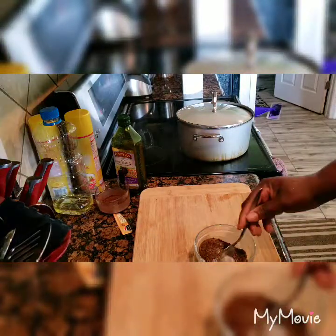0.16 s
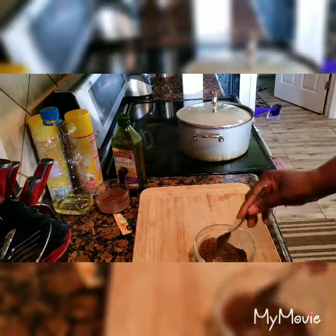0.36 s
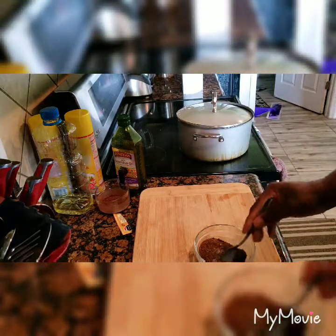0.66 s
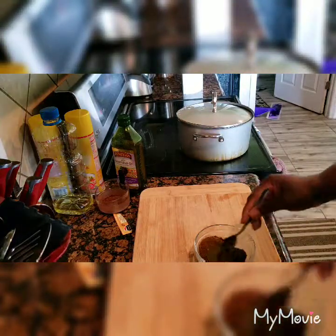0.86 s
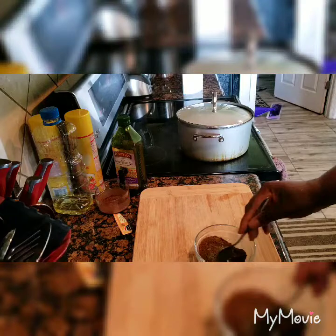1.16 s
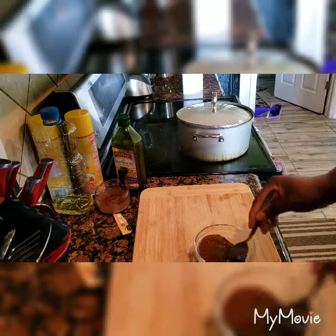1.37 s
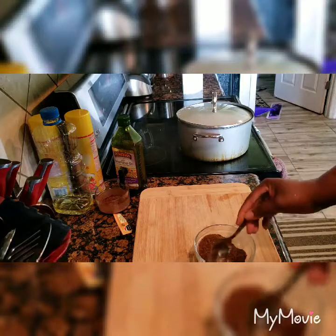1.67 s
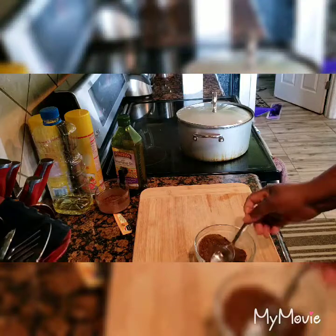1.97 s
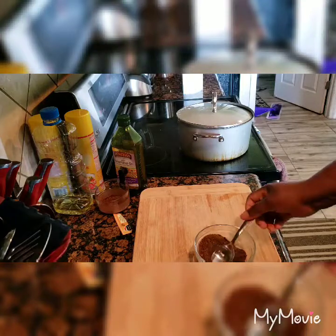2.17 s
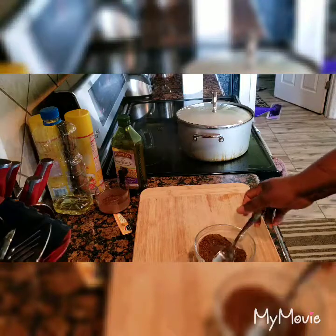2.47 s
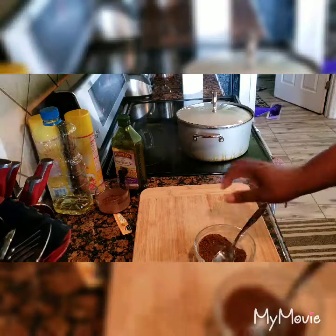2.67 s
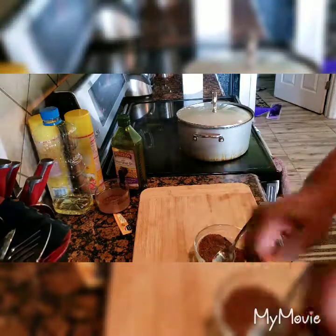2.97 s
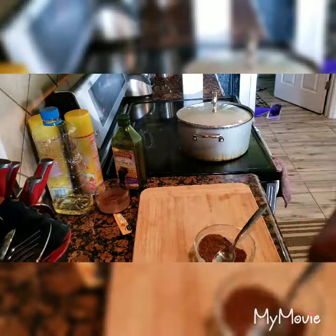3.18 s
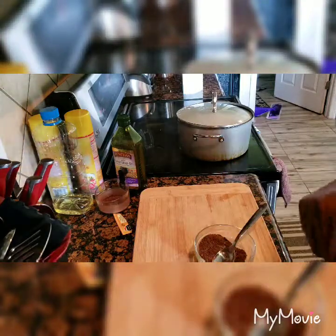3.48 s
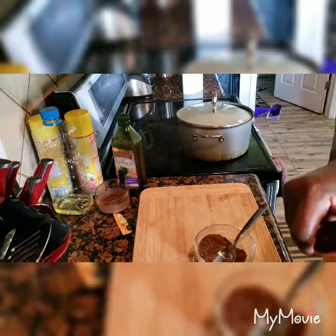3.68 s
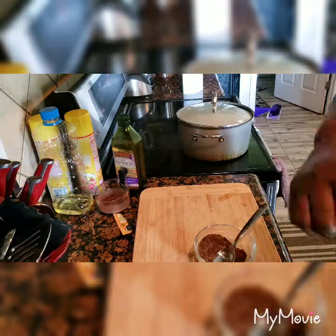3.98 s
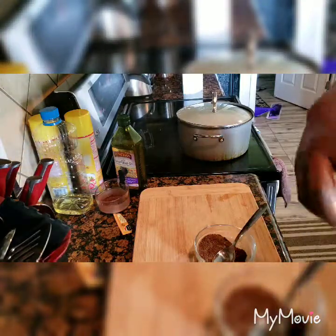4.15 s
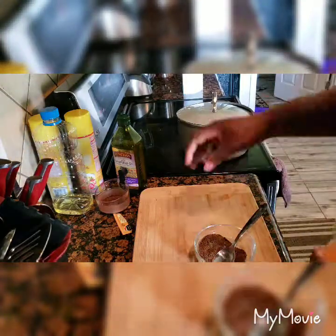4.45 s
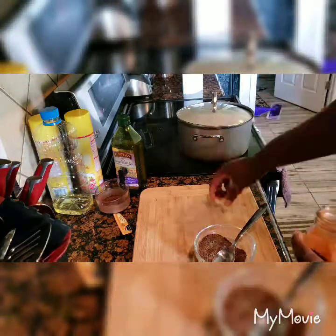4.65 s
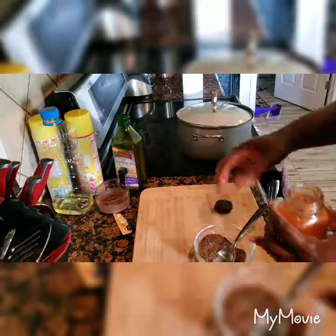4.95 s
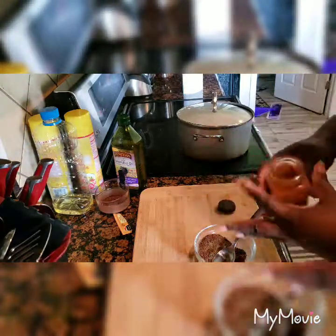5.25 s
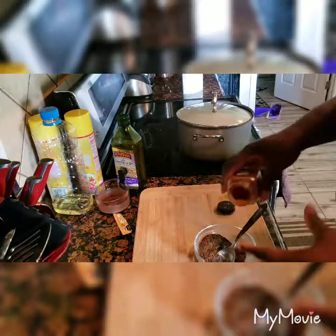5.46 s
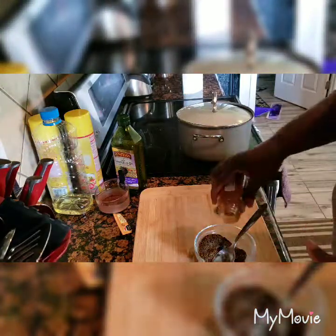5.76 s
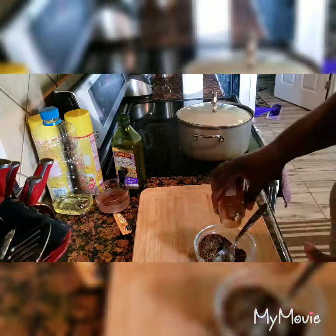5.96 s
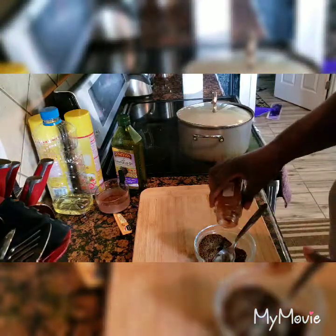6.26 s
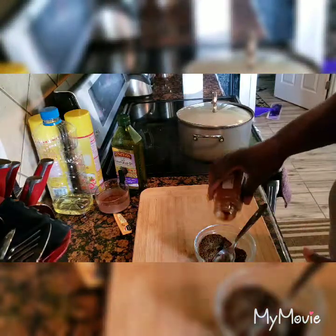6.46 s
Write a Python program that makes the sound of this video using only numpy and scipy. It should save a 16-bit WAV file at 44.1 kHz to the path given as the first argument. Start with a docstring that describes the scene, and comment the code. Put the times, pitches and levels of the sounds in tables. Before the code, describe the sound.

Close up in a lightly echoing kitchen, an appliance hums steadily while a spoon crunches softly through dry spices, tapping a glass bowl that bumps on a wooden board. The stirring ends with a bright chatter of the spoon on the rim. Then the cap of a spice jar rasps along its thread, clicks free, lands sharply on the board and rocks faintly like a coin until it lies flat.

```python
"""Over an appliance's steady hum, a metal spoon stirs gritty dry spices and taps a small glass bowl,
which knocks and scuffs on a wooden kitchen board. The spoon is let go and rings against the rim.
Then the cap of a spice jar is twisted off and dropped on the board, where it bounces and wobbles to rest.
Each hit is a set of fading tones plus a burst of noise; each rub is a stream of tiny random slips."""
import sys
import numpy as np
from scipy import signal
from scipy.fft import rfft, irfft, next_fast_len
from scipy.io import wavfile

SR = 44100
rng = np.random.default_rng(int(sys.argv[2]) if len(sys.argv) > 2 else 0)


def wav_out(sig):
    """Save sig, one row per channel (or a flat mono array), as 16-bit PCM at SR to the path in sys.argv[1]."""
    wavfile.write(sys.argv[1], SR, np.round(np.clip(np.atleast_2d(sig).T, -1, 1) * 32767).astype(np.int16))


N = 292118
TIME = np.arange(N) / SR

# Levels are relative, as the mix changes them later. A fade time (t60) is the time to fall by 60 dB.
# The appliance's hum. Each row: pitch in Hz, level in dB.
HUM_TONES = [(59.5, -62), (119.9, -54.5), (160, -64.5)]

# Single hits. Each row: start in seconds, level in dB, brightness in Hz.
SPOON_TAPS = [(0.0608, -50.5, 15100), (0.6714, -28.5, 15400), (0.6754, -24, 15000), (0.8255, -47.5, 15100),
              (1.1722, -56, 15000), (1.3754, -50, 15100), (1.7115, -45.5, 15400), (2.1174, -52, 14800)]
SPOON_DROPS = [(2.5446, -27.5, 14700), (2.5524, -24.5, 15500), (2.5604, -28, 15600), (2.5974, -33, 14700),
               (2.6054, -33, 13900)]
CLICKS = [(0.3096, -31.5, 12300), (0.759, -32.5, 14000), (1.4047, -48, 13500), (3.5353, -54.5, 5500),
          (3.8387, -49.5, 14000), (4.245, -36.5, 14100), (4.2692, -25.5, 15000), (4.2744, -40, 14000),
          (5.6191, -50.5, 14000)]
CAP_LANDINGS = [(4.987, -24.5, 17000), (5.008, -26, 9800), (5.200, -41, 2640)]
CAP_SLAPS = [(5.733, -43, 1670), (5.757, -36, 1640)]
# The bowl's knocks. Each row: start in seconds, level in dB, brightness in Hz, seconds to first bounce.
BOWL_KNOCKS = [(0.2, -26.5, 3960, .008), (0.244, -32.5, 2170, 0.0039), (0.446, -42, 2130, 0.02),
               (1.118, -38, 1480, 0.017), (1.894, -33.5, 2740, .007), (2.083, -42, 1760, 0.011)]
# Soft bumps. Each row: start in seconds, level in dB, pitch in Hz, fade time in seconds.
THUMPS = [(0.304, -33.5, 131, 0.063), (0.308, -40.5, 247, 0.066), (4.2355, -38, 595, 0.036),
          (4.243, -51, 344, 0.087), (4.270, -48, 560, 0.032)]
# The bowl's slides. Each row: loudest moment in seconds, level in dB.
SCUFFS = [(0.591, -62), (1.13, -51), (1.38, -60.5), (1.715, -54), (1.8, -58), (2.31, -60)]
# Fingers shift on the jar. Each row: loudest moment in seconds, level in dB, rise and fall in seconds.
GRIPS = [(3.46, -68.5, 0.77, 1.3), (3.75, -82, 0.16, 0.22)]
# One twist loosens the cap, the next runs it off the thread.
# Each row: loudest moment in seconds, hiss in dB, grinding in dB, rise and fall in seconds.
CAP_TURNS = [(3.973, -56.5, -56.5, 0.055, .75), (4.24, -56, -50.5, 0.74, .13)]

# The tones a thing rings with when hit. Each row: pitch in Hz, level in dB, fade time in seconds.
TAP_TONES = [(1960, -11, .07), (2929, -10, .08), (3790, -4, .1), (5055, -17, .1), (6352, -16, .1),
             (9250, -2, .14), (10690, 3, .1), (12380, -4, .07), (12800, -4, .08), (14980, -5, .08),
             (15500, -2, .08)]
BOWL_TONES = [(759, 10.5, 0.39), (1103, 28.5, 0.087), (1460, 8, 0.023), (1760, 6, 0.043), (2060, 8, 0.098),
              (2470, -6, 0.042), (2730, -18, 0.033)]
LOOSE_SPOON_TONES = [(1389, -16, .06), (3070, -11, .07), (3215, -10, .09), (3450, -9, .07), (5595, 4, .08),
                     (5650, -16, .22), (6874, -20, .08), (7680, -6, .05), (8430, -4, .1), (10800, -8, .08),
                     (11772, -5, .09), (12670, -6, .06), (14283, -4, .08), (15218, 3, .09)]
CAP_TONES = [(1420, -10, .05), (1560, 5, .055), (2420, -8, .06), (2652, -8, .07), (3070, -6, .07),
             (4870, -11, .09), (4895, -31, 1.1), (8430, -16, .13), (12550, -2, .05)]
FLAT_CAP_TONES = [(1236, -5, 0.023), (1370, -5, .035), (1557, -1.5, 0.043), (1680, -2.5, 0.036)]   # muffled by the board

# How much bass and treble each noise has. Each row: frequency in Hz, level there in dB.
ROOM_NOISE = [(15, -35), (28, -4.5), (42, -17), (58, -14), (80, -7.5), (125, -14.5), (165, -9), (210, -14),
              (330, -13.5), (650, -23.5), (1100, -36), (3000, -44), (6400, -48), (14500, -37)]
SPICE_NOISE = [(300, -13), (1150, 2), (1600, -7.5), (2200, -8), (3300, -11), (4800, -17), (8000, -6),
               (9500, -29.5), (11000, -8.5), (15000, -5.5)]
TAP_NOISE = [(260, -51), (450, -7.5), (635, 1.5), (1490, -11.5), (3700, -10), (5790, -26), (9070, -7.5),
             (10100, -21), (10500, -14.5), (16000, 0)]
BOWL_NOISE = [(150, -26), (300, -8), (500, -6), (700, 0), (920, -4), (1150, -1), (2600, -4), (3100, -15),
              (3900, -31), (9500, -42)]
CLICK_NOISE = [(410, -31), (700, -2.5), (1890, -23), (2400, -7.5), (4550, -10), (7790, -5), (8530, -13.5),
               (13000, -1), (16000, 3.5)]
LOOSE_SPOON_NOISE = [(600, -14), (1350, -8), (1750, -16), (2100, -11), (2600, -15), (3300, -2), (4500, -19),
                     (5600, -6), (6300, -16), (7800, -6), (9500, -13), (13000, -7), (15500, -3)]
THREAD_NOISE = [(300, -20.5), (950, -8), (1300, -10.5), (1700, -6.5), (2050, -2), (2400, -5.5), (3700, -5),
                (6500, -7), (8000, -1.5), (9500, -20.5), (12500, 1.5), (16000, -6.5)]
GRIND_NOISE = [(200, -32), (350, 5.5), (600, -4), (950, -10), (1300, 4), (1650, 0.5), (1950, -14),
               (3300, -3), (4700, -28), (9500, -14), (13000, -12), (16000, -12.5)]
CAP_NOISE = [(300, -27), (700, -16), (950, -18.5), (1280, -13), (1560, -5), (1900, -16), (2500, -6),
             (3100, -3.5), (3800, -10), (6000, -10), (8400, -16.5), (9300, -24.5), (11500, -23),
             (12600, -14.5), (16000, -27)]

# The kitchen's echo. Each row: frequency in Hz, fade time in seconds.
ECHO_FADES = [(200, 1), (1500, 0.51), (3000, 0.77), (6000, 0.63), (10000, 0.42), (16000, 0.38)]


def from_db(db):
    """Turn decibels into a number to multiply by."""
    return 10 ** (np.asarray(db) / 20)


def rms(x):
    """The average strength of a signal (root mean square)."""
    return np.sqrt(np.mean(x ** 2) + 1e-20)


def at_hz(points, hz):
    """Read between a table's rows, giving every octave equal space."""
    freqs, values = np.transpose(points)
    return np.interp(np.log(np.maximum(hz, 1)), np.log(freqs), values)


def fade(t, t60):
    """Die away, reaching 60 dB down after t60 seconds."""
    return np.exp(-np.log(1000) * t / t60)


def coloured(noise, spectrum):
    """Shape a noise's bass and treble by a table, and set its strength to 1."""
    size = next_fast_len(len(noise))
    gains = from_db(at_hz(spectrum, np.fft.rfftfreq(size, 1 / SR)))
    shaped = irfft(rfft(noise, size) * gains, size)[:len(noise)]
    return shaped / rms(shaped)


def drift(rate, size=N):
    """Wander around zero, heading for a new random value `rate` times a second."""
    targets = rng.standard_normal(int(size / SR * rate) + 2)
    return np.interp(TIME[:size] * rate, np.arange(len(targets)), targets)


def add(out, start_s, sound):
    """Mix a sound in at the given time."""
    start = int(round(start_s * SR))
    out[start:start + len(sound)] += sound[:N - start]


def stroke(peak_s, rise_s, fall_s):
    """A push of the hand: it grows by 60 dB up to its peak, then dies away."""
    return fade(np.maximum(peak_s - TIME, 0), rise_s) * fade(np.maximum(TIME - peak_s, 0), fall_s)


def struck(hits, tones, spectrum, noise_db, noise_t60, detune=.004, contact_cycles=5.4):
    """Each hit rings a few clear tones; a noise burst stands for the many short-lived ones."""
    out, t = np.zeros(N), TIME[:SR * 2 // 3]
    head = SR // 120   # the first 8 ms set the level
    waver = 1 - fade(t, 0.15)
    for start_s, level_db, bright_hz in hits:
        ring = np.zeros(len(t))
        for hz, db, t60 in tones:
            shifted_hz = hz * (1 + detune * rng.uniform(-1.17, 1))   # each contact point bends the pitch
            phase = 2 * np.pi * (shifted_hz * t + rng.random())
            # the loose object keeps moving, so its ring wavers more and more
            swell, sway = (waver * drift(110, size=len(t)) for _ in range(2))
            tone = (1 - waver / 2 + swell) * np.sin(phase) + sway * np.cos(phase)
            ring += from_db(db) * fade(t, t60) * tone
        burst = coloured(rng.standard_normal(len(t)), spectrum) * fade(t, noise_t60)
        hit = ring / rms(ring[:head]) + from_db(noise_db) * burst / rms(burst[:head])
        # a softer contact starts more slowly and sounds duller
        hit *= 1 - np.exp(-t * bright_hz / contact_cycles)
        hit = signal.sosfilt(signal.butter(4, min(bright_hz, .45 * SR), fs=SR, output="sos"), hit)
        add(out, start_s, from_db(level_db) * hit / rms(hit[:head]))
    return out


def rubbed(pressure, spectrum, grain_db, shake_db, shake_rate):
    """Rubbing is a dense stream of tiny, uneven slips under a shaky hand."""
    slips = rng.standard_normal(N) * from_db(grain_db * np.minimum(rng.exponential(1, N), 5))
    return coloured(slips, spectrum) * pressure * from_db(shake_db * drift(shake_rate))


def appliance_hum():
    """Mains power makes an appliance hum, over low rumble and faint hiss."""
    hum = 0
    for hz, db in HUM_TONES:
        wavering_level = from_db(db + 1.1 * drift(9.7)) * np.sqrt(2)
        hum += wavering_level * np.sin(2 * np.pi * (hz * TIME + rng.random()))
    return hum + from_db(-57) * coloured(rng.standard_normal(N), ROOM_NOISE)


def stirring(turns_per_s=3.12, first_push_s=.2, let_go_s=2.54, tone_width_hz=140):
    """Grains crunch between spoon and glass, harder once each turn, and make the spoon ring faintly."""
    push = np.cos(2 * np.pi * turns_per_s * (TIME - first_push_s))
    pressure = from_db(-69 + 3.0 * push) * fade(np.maximum(TIME - let_go_s, 0), t60=0.25)
    grit = rubbed(pressure, SPICE_NOISE, grain_db=6.0, shake_db=3.0, shake_rate=51)
    ring = sum(from_db(db) * signal.lfilter(*signal.iirpeak(hz, hz / tone_width_hz, fs=SR), grit)
               for hz, db, _ in TAP_TONES)
    return from_db(-2.5) * grit + from_db(1.0) * ring


def spoon_taps():
    """Metal meets glass with a short, bright clink."""
    return struck(SPOON_TAPS, TAP_TONES, TAP_NOISE, noise_db=8.5, noise_t60=0.072, detune=0.0034)


def bowl_knocks(bounce_loss_db=3.5, gap_shrink=.75):
    """The bowl knocks on the board and bounces twice, weaker and sooner each time."""
    hits = []
    for start_s, db, bright_hz, gap_s in BOWL_KNOCKS:
        for bounce in range(3):
            hits.append((start_s, db - bounce_loss_db * bounce, bright_hz))
            start_s += gap_s * gap_shrink ** bounce
    return struck(hits, BOWL_TONES, BOWL_NOISE,
                  noise_db=10.0, noise_t60=0.037, detune=0.044, contact_cycles=1.7)


def thumps():
    """Each soft bump on the board or jar is one low tone that dies quickly."""
    out, t = np.zeros(N), TIME[:SR // 2]
    for start_s, db, hz, t60 in THUMPS:
        add(out, start_s, from_db(db) * fade(t, t60) * np.sin(2 * np.pi * hz * t))
    return out


def muffled_clicks():
    """The held spoon, and later the jar, click without ringing."""
    return struck(CLICKS, [], CLICK_NOISE, noise_db=0, noise_t60=0.04, contact_cycles=2.3)


def bowl_scuffs(dull_hz=1480):
    """The spoon pushes the bowl into short slides; the soft wood gives them little treble."""
    pressure = sum(from_db(db) * stroke(peak_s, rise_s=0.087, fall_s=0.18) for peak_s, db in SCUFFS)
    slide = rubbed(pressure, BOWL_NOISE, grain_db=10.0, shake_db=-1.5, shake_rate=39)
    return signal.sosfilt(signal.butter(2, dull_hz, fs=SR, output="sos"), slide)


def spoon_drop():
    """Once let go, the spoon chatters and rings on the rim."""
    return struck(SPOON_DROPS, LOOSE_SPOON_TONES, LOOSE_SPOON_NOISE,
                  noise_db=-1.0, noise_t60=0.077, detune=0.0029)


def unscrewing():
    """Fingers rub the jar; the cap hisses along its thread and grinds at the height of each twist."""
    sliding = sum(from_db(db) * stroke(peak_s, rise_s, fall_s) for peak_s, db, rise_s, fall_s in GRIPS)
    grinding = 0
    for peak_s, hiss_db, grind_db, rise_s, fall_s in CAP_TURNS:
        turn = stroke(peak_s, rise_s, fall_s)
        sliding += from_db(hiss_db) * turn
        grinding += from_db(grind_db) * turn ** 1.86   # comes and goes more steeply than the hiss
    hiss = rubbed(sliding, THREAD_NOISE, grain_db=1.5, shake_db=1.0, shake_rate=70)
    return hiss + rubbed(grinding, GRIND_NOISE, grain_db=7.5, shake_db=4.0, shake_rate=110)


def cap_drop():
    """The cap bounces on the board, wobbles on its rim and slaps down flat."""
    bounces = struck(CAP_LANDINGS + cap_wobble(), CAP_TONES, CAP_NOISE,
                     noise_db=-3.0, noise_t60=0.1, detune=0.0036, contact_cycles=9.5)
    slaps = struck(CAP_SLAPS, FLAT_CAP_TONES, CAP_NOISE,
                   noise_db=0, noise_t60=0.01, detune=0.018, contact_cycles=2.0)
    return from_db(-1.0) * bounces + from_db(-4.5) * slaps


def cap_wobble(touches=10, start_s=5.2, end_s=5.757, roll_hz=4.36, start_hz=2500, end_hz=1240):
    """List the hits as the cap rocks like a coin: faster, weaker and duller as it sinks."""
    progress = np.arange(1, touches + 1) / (touches + 1)
    times = end_s - (end_s - start_s) * (1 - progress) ** 1.395
    roll = np.cos(2 * np.pi * roll_hz * (times - start_s))   # heavier when its low side comes round
    levels_db = -44.5 - 8.5 * progress + 3.5 * roll
    bright_hz = start_hz * (end_hz / start_hz) ** progress
    return list(zip(times, levels_db, bright_hz))


def kitchen_echo(sound, near_db=-5.0, tail_db=-10.0):
    """Quick echoes from counter and tiles, then a tail whose highest treble dies first."""
    t = TIME[:SR * 3 // 4]
    edges_hz = np.geomspace(100, 18000, 12)
    tail = np.zeros(len(t))
    for low, high in zip(edges_hz, edges_hz[1:]):
        band_filter = signal.butter(2, [low, high], "band", fs=SR, output="sos")
        band = signal.sosfilt(band_filter, rng.standard_normal(len(t)))
        tail += band * fade(t, at_hz(ECHO_FADES, np.sqrt(low * high)))
    tail *= np.minimum(t / 0.005, 1)
    near = rng.standard_normal(len(t)) * fade(t, t60=0.097) * (t > .002)
    echo = from_db(near_db) * near / np.linalg.norm(near) + from_db(tail_db) * tail / np.linalg.norm(tail)
    return signal.fftconvolve(sound, echo)[:N]


def scene():
    """Mix bowl, spoon and jar cap, heard close up in the kitchen, into one channel."""
    bowl = from_db(-8.0) * bowl_knocks() + bowl_scuffs()
    spoon = from_db(-13) * spoon_taps() + from_db(-7.5) * spoon_drop()
    clicks = from_db(-11.5) * muffled_clicks()
    on_board = bowl + spoon + cap_drop() + stirring() + thumps()
    in_hand = clicks + unscrewing()
    echo = kitchen_echo(on_board + from_db(-2.0) * in_hand)   # the hand shields what it holds
    return (on_board + in_hand + echo + appliance_hum())[None]


def record(dry):
    """Cut away the treble above 16100 Hz."""
    return signal.sosfilt(signal.ellip(10, .2, 80, 16100, fs=SR, output="sos"), dry)


dry = scene()
out = record(dry)
wav_out(out)
```